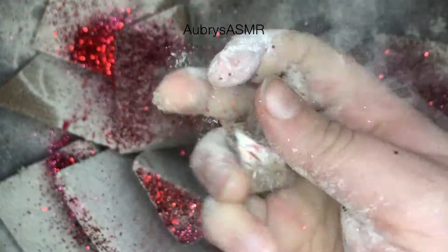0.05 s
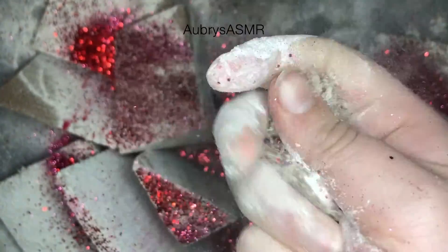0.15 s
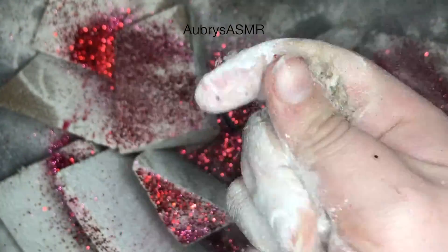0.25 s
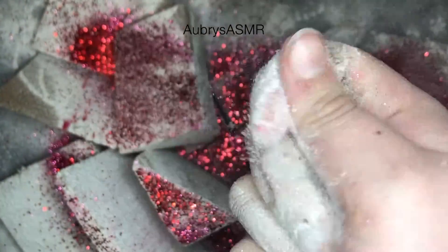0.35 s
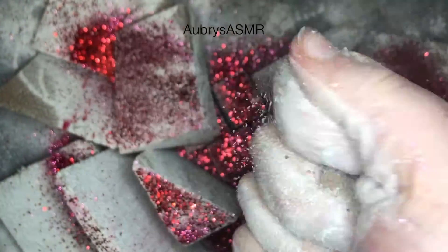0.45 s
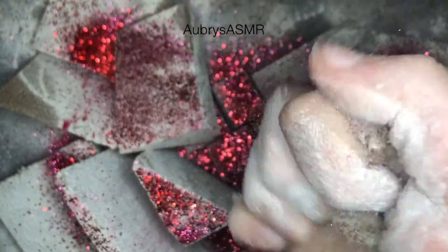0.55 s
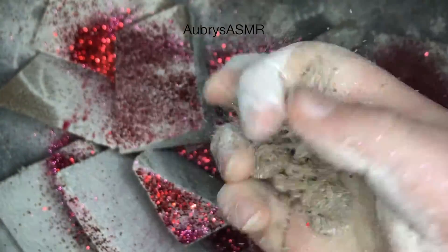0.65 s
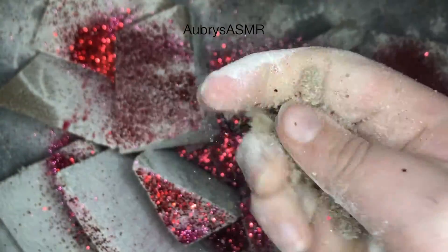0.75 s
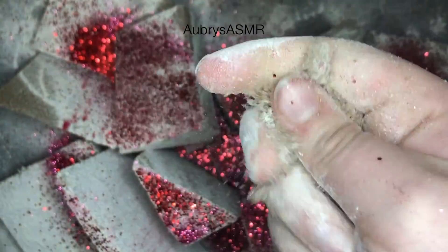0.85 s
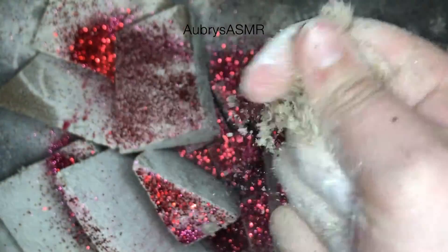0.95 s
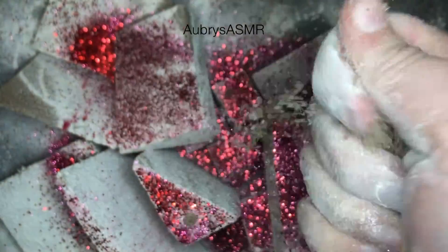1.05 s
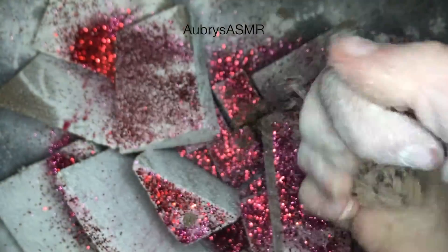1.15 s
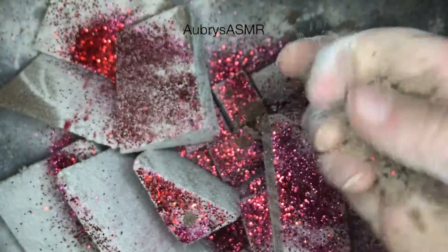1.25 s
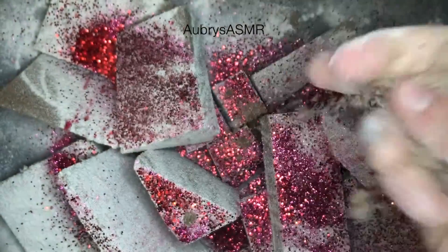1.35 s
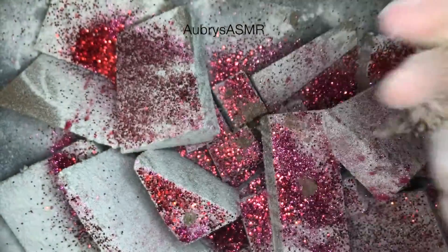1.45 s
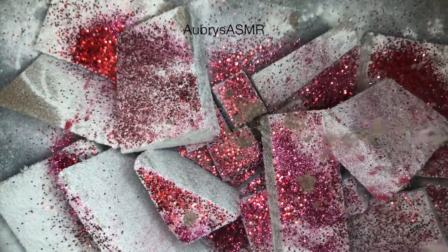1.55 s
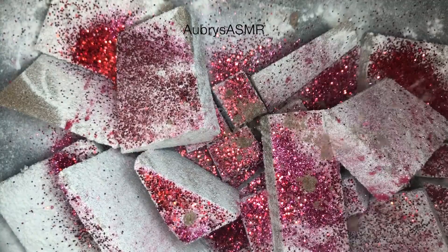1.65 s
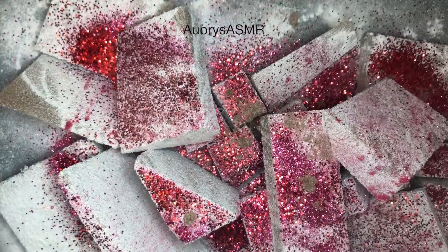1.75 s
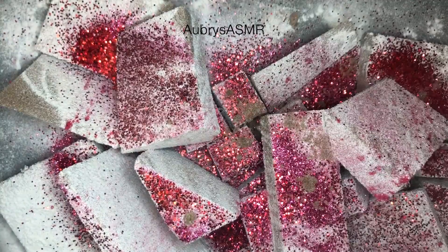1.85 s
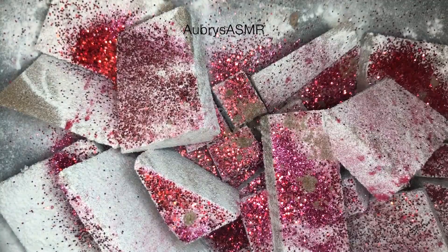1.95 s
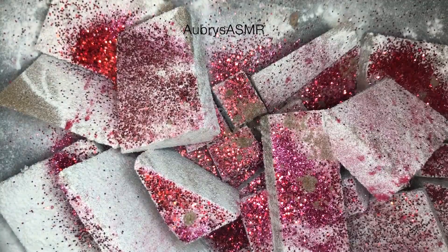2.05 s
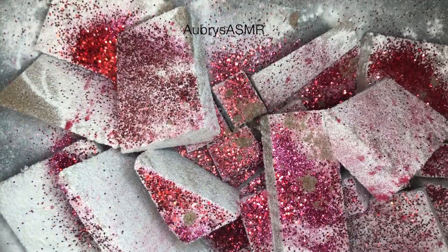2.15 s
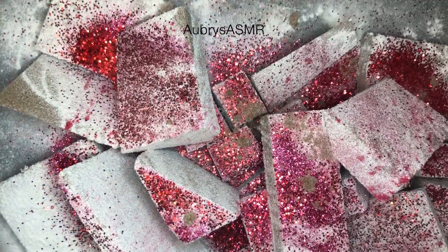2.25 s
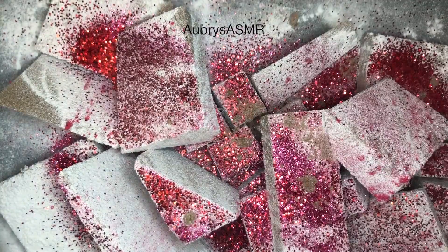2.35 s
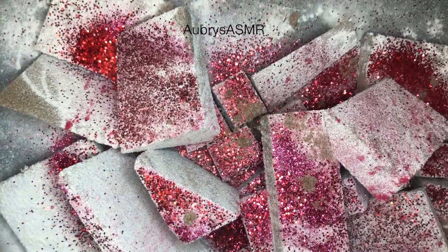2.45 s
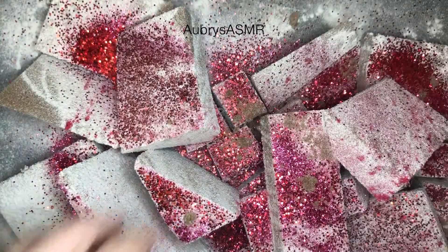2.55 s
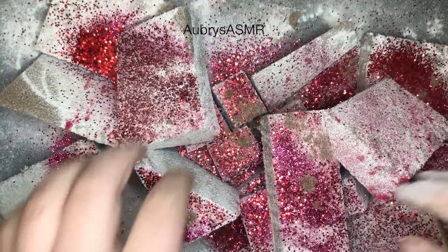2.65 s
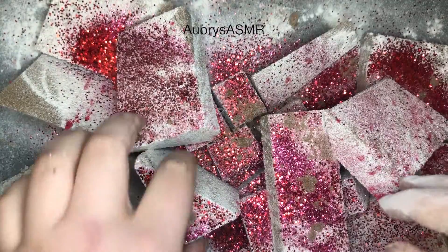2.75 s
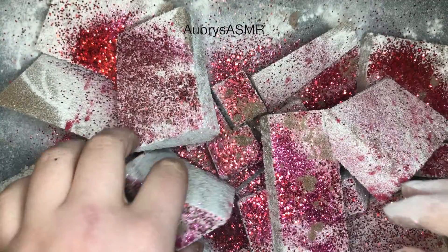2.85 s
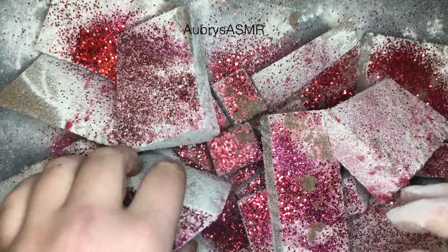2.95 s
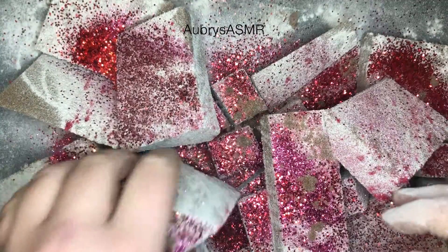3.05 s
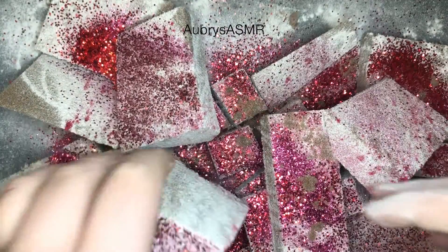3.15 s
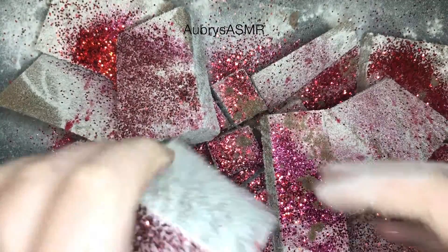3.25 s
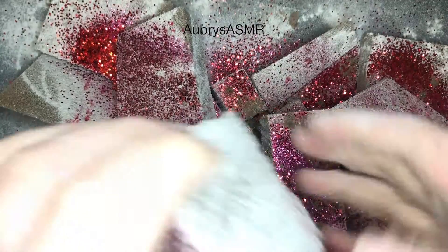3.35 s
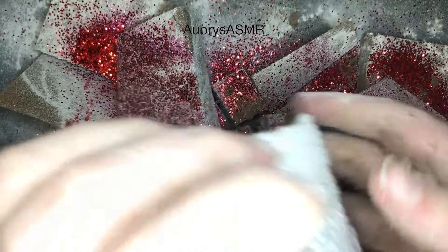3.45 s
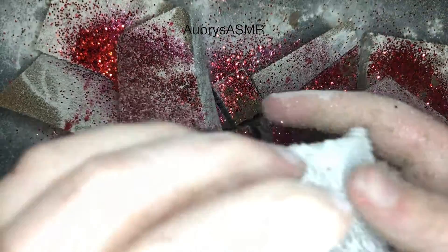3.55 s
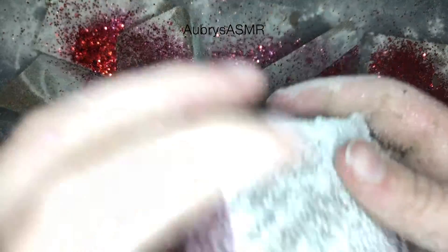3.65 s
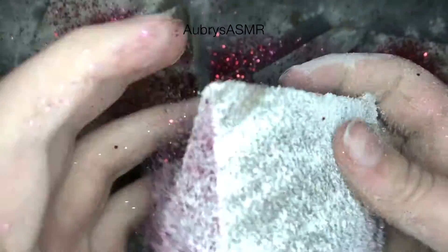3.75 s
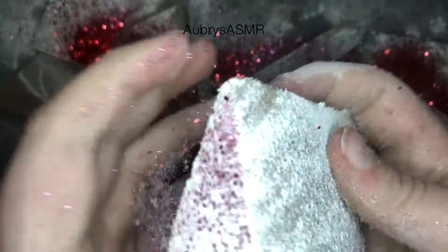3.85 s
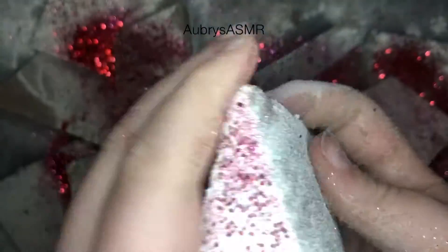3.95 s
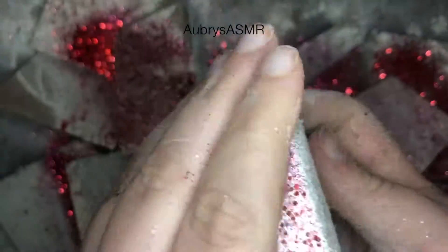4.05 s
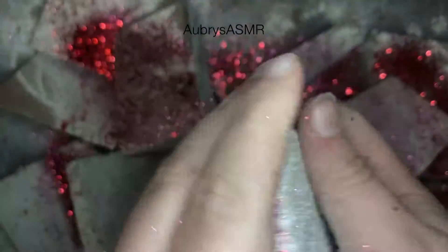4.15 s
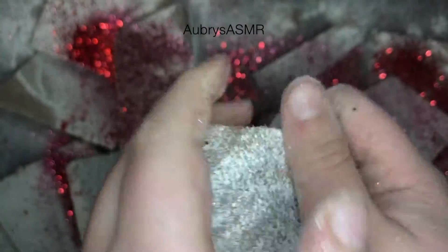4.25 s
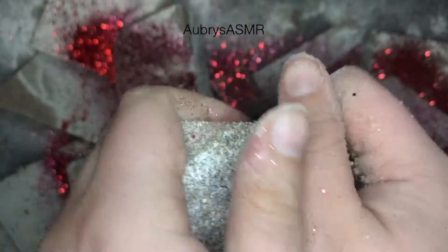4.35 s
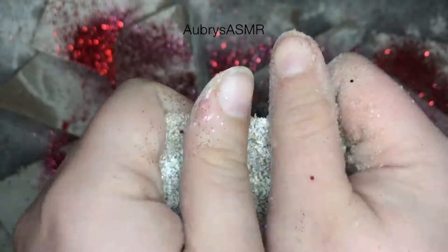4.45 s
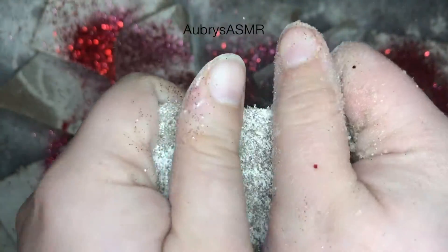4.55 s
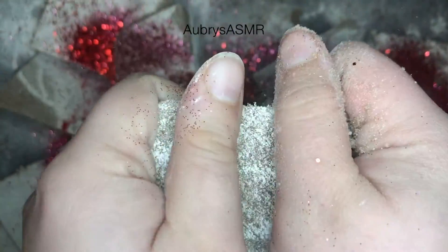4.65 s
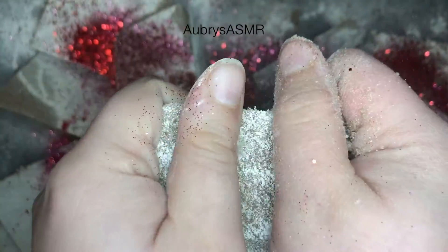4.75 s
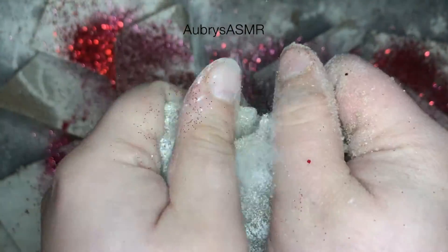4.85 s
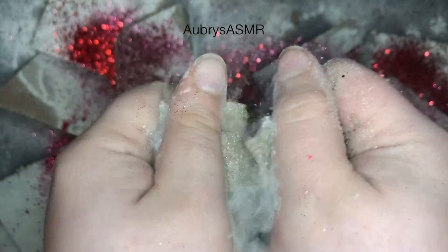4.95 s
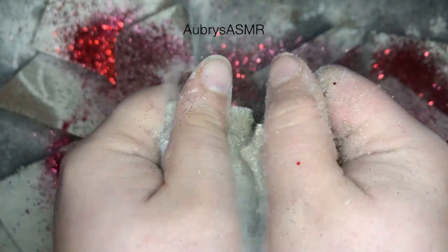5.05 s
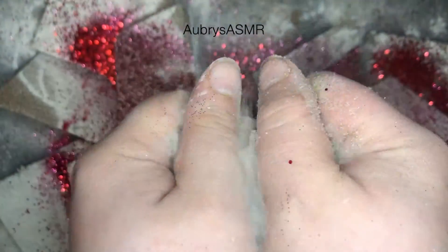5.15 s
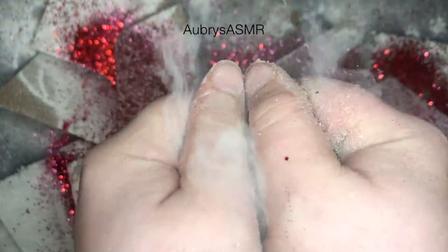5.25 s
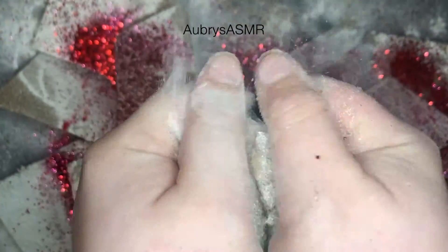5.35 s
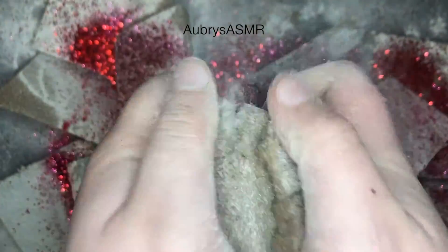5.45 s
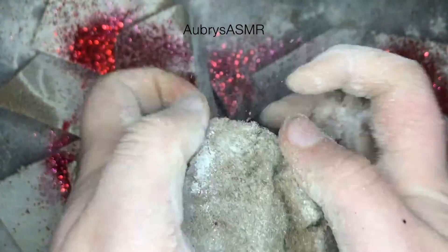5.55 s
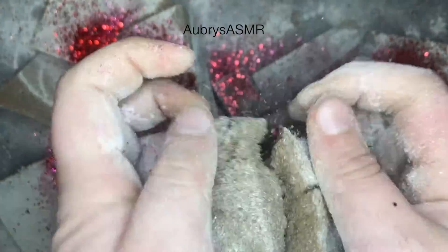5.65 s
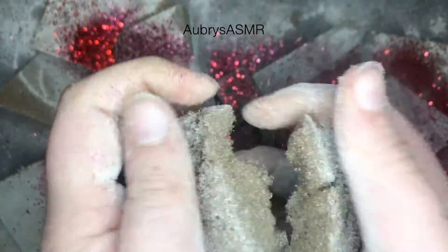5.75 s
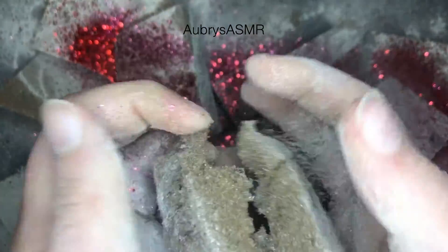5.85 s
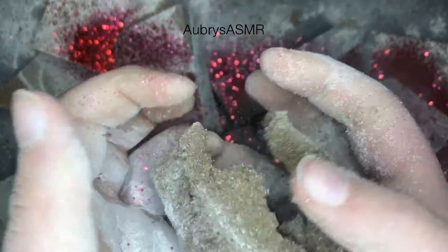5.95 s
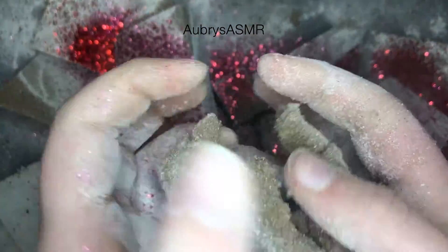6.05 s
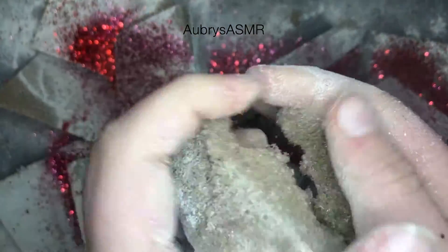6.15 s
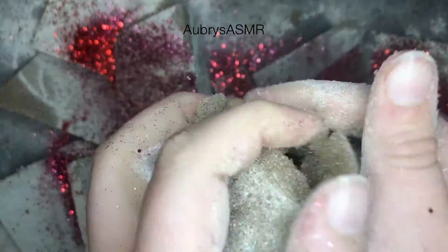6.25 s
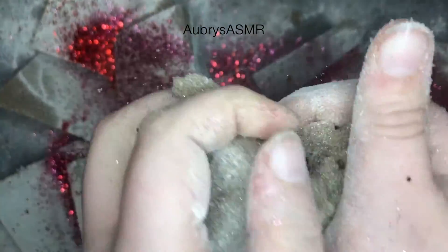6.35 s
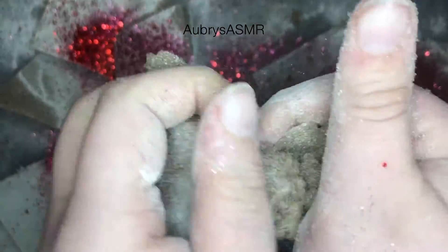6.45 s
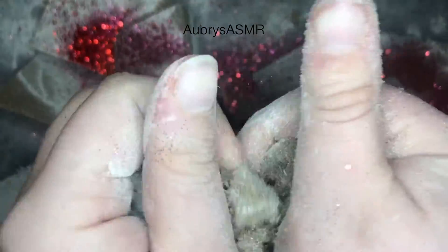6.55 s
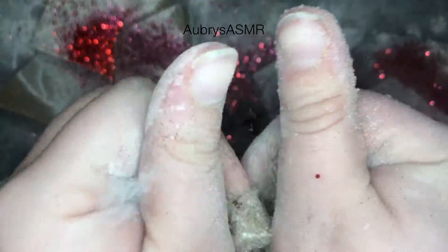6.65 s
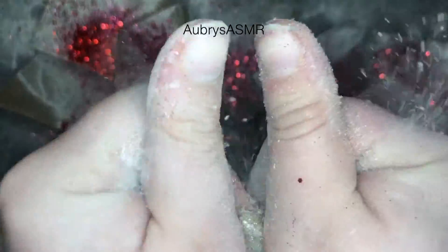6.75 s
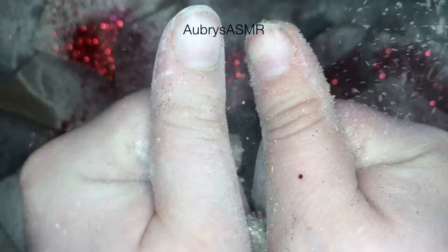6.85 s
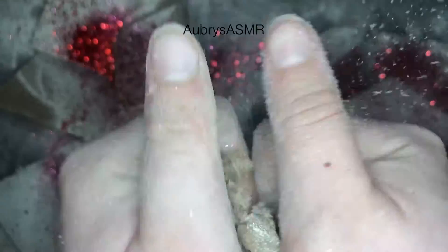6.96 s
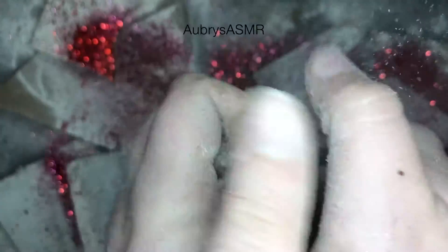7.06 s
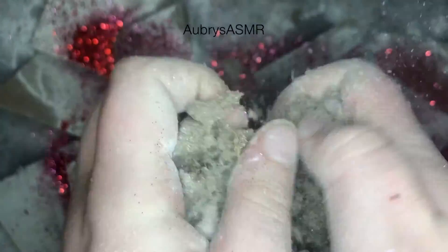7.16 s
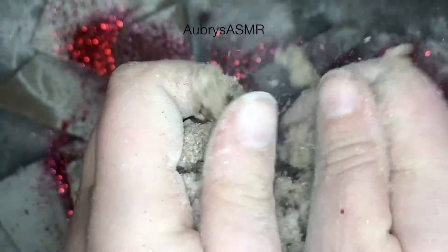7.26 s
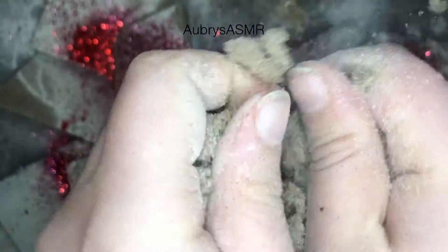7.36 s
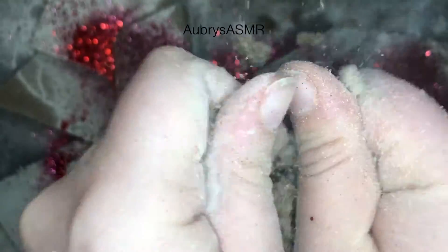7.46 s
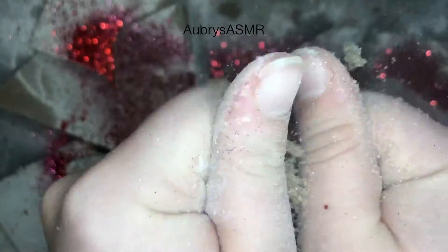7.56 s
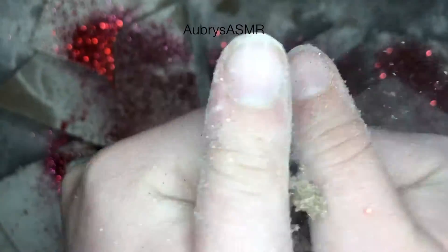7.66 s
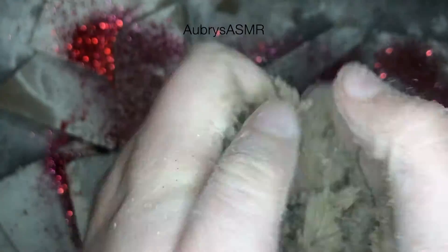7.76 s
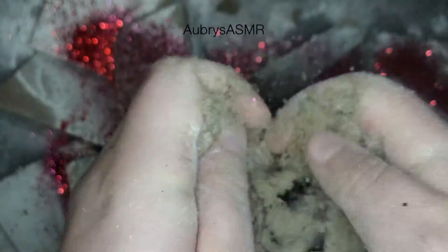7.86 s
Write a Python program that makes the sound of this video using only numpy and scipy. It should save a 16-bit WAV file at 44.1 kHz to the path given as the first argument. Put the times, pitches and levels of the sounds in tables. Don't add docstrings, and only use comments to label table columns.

```python
import sys
import numpy as np
from scipy import signal
from scipy.fft import rfft, irfft, next_fast_len
from scipy.io import wavfile

SR = 44100
rng = np.random.default_rng(int(sys.argv[2]) if len(sys.argv) > 2 else 0)


def boost_factor(decibels):
    exponent = np.asarray(decibels, float) / 20
    return 10 ** exponent


def master(y):
    cut = np.clip(np.atleast_2d(y).T, -1, 1)
    pcm = np.round(cut * 32767)
    wavfile.write(sys.argv[1], SR, pcm.astype(np.int16))


N = 347949


def rms_one(x):
    return x / np.sqrt(np.mean(x ** 2) + 1e-20)


def in_time(rows):
    s, *columns = np.transpose(rows)
    return [np.interp(np.arange(N) / SR, s, c) for c in columns]


def at_hz(points, hz):
    spectrum_hz, spectrum_db = np.transpose(points)
    return np.interp(np.log(hz), np.log(spectrum_hz), spectrum_db)


def drift(rate_hz):
    r = np.exp(-40 * np.pi * rate_hz / SR)
    slow = signal.lfilter([1], [1, -2 * r, r * r], rng.standard_normal(N // 20 + 2002))[2000:]
    return np.interp(np.arange(N) / 20, np.arange(len(slow)), rms_one(slow))


def resonance(x, hz, width_hz):
    r = np.exp(-np.pi * width_hz / SR)
    poles = [1, -2 * r * np.cos(2 * np.pi * hz / SR), r * r]
    return signal.lfilter([(1 - r * r) / 2, 0, (r * r - 1) / 2], poles, x + 1e-18)


def bursts(per_s, spread_db):
    sizes = boost_factor(spread_db * np.minimum(rng.exponential(1, N), 5)) * rng.choice([-1, 1], N)
    return rms_one(sizes * (rng.random(N) < per_s / SR))


def prompt(spectrum, colour_db, count):
    hz = np.maximum(np.arange(513), 1) * SR / 1024
    half_octaves = np.maximum(1 - np.abs(np.arange(15)[:, None] - 2 * np.log2(hz / 120)), 0)
    tint = rng.standard_normal((count, 15)) @ half_octaves
    response_db = np.maximum(at_hz(spectrum, hz), -50) + colour_db * tint
    cepstrum = irfft(np.log(boost_factor(response_db)), 1024)
    cepstrum[:, 1:512] *= 2
    return irfft(np.exp(rfft(cepstrum[:, :512], 1024)), 1024)[:, :512]


def foam(spectrum, level_db, breaks, at_s, peak_db, cracks, per_s, spread_db, crack_db, wander_db, sharp,
         colour_db, count, contrast=1):
    pitches_hz = np.geomspace(spectrum[1][0], min(spectrum[-2][0], .42 * SR), count)
    fine = bursts(per_s, spread_db)
    dealt = rng.integers(0, count, N)
    grains = 0
    for k, hz in enumerate(pitches_hz):
        gain = (-1) ** k * boost_factor(at_hz(spectrum, hz))
        width_hz = hz / sharp
        favoured = boost_factor(wander_db * drift(5.2))
        ringing = resonance(resonance(fine * (dealt == k), hz, width_hz), hz, 2 * width_hz)
        grains = grains + gain * favoured * ringing
    cracked = signal.fftconvolve(cracks, prompt(spectrum, 0, count=1)[0])[:N]
    out = boost_factor(level_db) * rms_one(rms_one(grains) + boost_factor(crack_db) * rms_one(cracked))
    responses = prompt(np.array(spectrum) * [1, contrast], colour_db, count=len(breaks))
    rung = signal.fftconvolve(breaks, responses, axes=1)
    lead_s = .0004
    for s, db, ring in zip(at_s - lead_s, peak_db, rung):
        part = out[max(round(s * SR), 0):][:len(ring)]
        part += boost_factor(db) * ring[:len(part)] / np.abs(ring).max()
    return out


def efforts():
    # t/s, effort as cell fizz level/dB, hollow (struts over fizz) level/dB
    knead_first = [(0, -49, -5), (.045, -55.5, -7.5), (.11, -39.5, -7), (.135, -31.5, -3.5),
                   (.19, -30.5, -9), (.35, -31, -14.5), (.37, -37.5, -13.5), (.67, -50, -3.5),
                   (.72, -60, -7.5)]
    knead_again = [(0.78, -53, -4), (0.86, -36.5, -7.5), (.9, -38, -4.5), (.92, -37.5, -12),
                   (1.07, -45, -15), (1.186, -47.5, 1), (1.216, -55, -0.5), (1.312, -56.5, -10),
                   (1.32, -62, -6)]
    knead_last = [(1.4, -43.5, -7.5), (1.47, -33.5, -15), (1.56, -51.5, -5.5), (1.6, -44, -10),
                  (1.69, -53.5, -13), (1.87, -61.5, 6.5), (1.98, -80.5, -11)]
    reach = [(2.04, -48.5, -13), (2.46, -81.5, 8.5), (2.81, -80.5, 4), (2.877, -56, -2.5),
             (3.07, -57.5, -0.5), (3.34, -72.5, 1), (3.52, -64.5, 6), (3.547, -69, -4)]
    turn_block = [(3.562, -42, 3), (3.581, -54.5, 7), (3.63, -51.5, -2), (3.67, -44.5, -4.5),
                  (3.73, -65, -4.5), (3.98, -46, -4.5)]
    press = [(4.05, -44.5, -3.5), (4.334, -35.5, -4.5), (4.438, -36.5, -4), (4.5, -29.5, -8),
             (4.536, -40, -4), (4.564, -32, -6), (4.612, -35.5, -5.5), (4.634, -34.5, -6.5),
             (4.72, -40.5, -4.5)]
    split_block = [(4.88, -32.5, -7), (4.94, -32, 0.5), (4.96, -50, -6), (4.99, -29.5, -5.5),
                   (5.07, -36.5, -8.5), (5.12, -28.5, -8.5), (5.25, -30.5, -12), (5.34, -37, -12.5),
                   (5.42, -50.5, -13)]
    shift_grip = [(5.46, -45.5, 1.5), (5.652, -54, -4), (5.656, -46.5, -3), (5.836, -59, 0.5),
                  (6.018, -63, -4), (6.07, -62, -2), (6.14, -52.5, 1.5)]
    fold = [(6.24, -44.5, -6), (6.262, -34.5, -8), (6.5, -35, -6.5), (6.594, -31, -7), (6.626, -32.5, -8),
            (6.714, -32, -4), (6.844, -33, -17), (7.016, -45, -6.5), (7.03, -48.5, -1.5)]
    crumble = [(7.08, -45, -1.5), (7.186, -42, -8), (7.244, -53, -5), (7.306, -41, -10),
               (7.366, -44.5, -5.5), (7.474, -32, -7), (7.578, -35, -15), (7.738, -52, -0.5),
               (7.89, -43.5, -6)]
    kneading = knead_first + knead_again + knead_last
    crushing = reach + turn_block + press + split_block
    return in_time(sorted(kneading + crushing + shift_grip + fold + crumble))


def tearing(per_s, fade_s, jump_db):
    # t/s, jump level/dB, fade/s
    slips = [(0.134, 5, 0.0059), (1.998, -5, 0.016), (2.041, 5, 0.025), (2.372, 14, 0.072),
             (2.54, 12, 0.014), (2.613, 8.5, 0.19), (2.859, 10.5, 0.026), (2.977, 20.5, 0.033),
             (3.073, 19, 0.0069), (3.18, 20.5, 0.026), (3.407, 25, 0.0043), (3.44, 16, 0.0084),
             (3.559, 9, 0.016), (3.787, 14, 0.015), (3.843, -9.5, 0.0054), (3.871, 17, 0.021),
             (3.919, 1, .015), (4.881, 16.5, 0.0099), (4.895, -6, 0.013), (2.942, -15.5, 0.046)]
    # middle t/s, half width/s, level/dB
    surges = [(0.122, 0.0053, -1), (0.301, 0.004, -3.5), (0.43, 0.009, 2.5), (0.578, 0.01, -6),
              (1.093, 0.028, -3.5), (3.205, 0.0054, -5), (3.555, 0.0043, -12), (3.708, 0.015, 10.5),
              (3.907, 0.006, -3), (4.038, 0.0061, 7.5), (4.08, 0.014, 0.5), (4.139, 0.0055, 3.5),
              (4.173, 0.041, 4.5), (4.431, 0.0041, -3), (4.755, 0.004, -1), (4.808, 0.023, 2.5),
              (4.895, 0.0046, -5), (4.944, 0.004, -6), (4.966, 0.0053, 8.5), (5.019, 0.004, -9.5),
              (5.04, 0.0065, 4), (5.172, 0.011, -7), (5.235, 0.0044, 6.5), (5.73, 0.024, -7),
              (6.255, 0.0083, -4), (6.654, 0.027, -6.5), (6.853, 0.004, 5), (6.963, 0.016, 1)]
    leaps = rng.exponential(1, N) * (rng.random(N) < per_s / SR)
    sag = signal.lfilter([1], [1, -np.exp(-1 / (fade_s * SR))], leaps + 1e-18)
    front_db = jump_db * np.tanh(sag / 2 - sag.mean() / 2)
    t, rise_s = np.arange(SR // 4) / SR, 0.0014
    for s, db, slip_fade_s in slips:
        decay = np.exp(-t / max(slip_fade_s, 1e-3))
        front_db[round(s * SR):][:len(t)] += db * decay * (1 - np.exp(-t / rise_s))
    for s, half_s, db in surges:
        near = np.arange(max(round((s - .08) * SR), 0), round((s + .08) * SR))
        front_db[near] += db * np.exp(-((near / SR - s) / max(half_s, 2e-3)) ** 2)
    return front_db


def coarse(crunch_db):
    # middle t/s, half width/s, thud level/dB, chip grind over thud level/dB
    shears = [(.31, 0.058, -68, 14), (.39, 0.092, -58, 1), (.885, 0.022, -80, 18), (7.12, .07, -78, 17.5),
              (1.01, 0.035, -66, 7), (1.47, 0.043, -71.5, 8.5), (1.67, 0.022, -69, 7.5),
              (2.95, 0.3, -72.5, -3), (3.561, 0.012, -61, -1), (3.67, 0.02, -61.5, 0), (4.2, 0.16, -61, 0),
              (4.341, 0.053, -48.5, 2), (4.48, 0.036, -56, 3), (4.87, 0.046, -68, -6),
              (5.04, 0.015, -72.5, 0), (5.22, 0.11, -64, 7), (5.537, 0.015, -54, 0),
              (5.67, 0.065, -63.5, -5), (6.28, 0.053, -58, 6), (6.42, 0.058, -51, -2),
              (6.53, 0.03, -55, -7.5), (6.59, 0.044, -59.5, 5), (6.72, 0.14, -63, 7.5),
              (6.88, 0.036, -58, 0.5), (7.19, 0.057, -62.5, 0.5), (7.62, 0.05, -55.5, 0),
              (7.84, 0.022, -60.5, 3.5)]
    middle_db, grind_rest_db, grind_follows, shear_rest_db, shear_follows = -49.5, -64.5, 0.67, -71.5, 0.3
    t, swing_db = np.arange(N) / SR, crunch_db - middle_db
    grind = boost_factor(grind_rest_db + grind_follows * swing_db) ** 2
    shear = boost_factor(shear_rest_db + shear_follows * swing_db) ** 2
    for s, half_s, db, over_db in shears:
        near = slice(max(int((s - .4) * SR), 0), int((s + .4) * SR))
        swell = boost_factor(db) ** 2 * np.exp(-((t[near] - s) / half_s) ** 2)
        grind[near] += boost_factor(over_db) ** 2 * swell
        shear[near] += swell
    dip_s, dip_half_s, dip_db = 5.405, 0.045, -13
    pause_db = dip_db * np.exp(-((t - dip_s) / dip_half_s) ** 2)
    return 10 * np.log10(grind) + pause_db, 10 * np.log10(shear) + pause_db


def snaps(fizz_db, crunch_db):
    # t/s, bright peak level/dB, ringing
    # peak level/dB
    clear_breaks = [(0.0047, -43, -57), (0.0676, -37, -61), (0.1141, -25, -27), (0.1387, -9, -14),
                    (0.17, -28.5, -18.5), (0.1725, -27, -20.5), (0.1769, -26, -43), (0.1944, -19, -24),
                    (0.198, -14.5, -24), (0.2141, -18.5, -50), (0.2212, -11, -39), (0.2305, -17, -47.5),
                    (0.2394, -14.5, -21), (0.2451, -14, -41), (0.2588, -13, -43), (0.2627, -8, -25),
                    (0.2707, -23, -33), (0.2832, -21, -42), (0.2951, -16, -26), (0.3262, -12, -36),
                    (0.3419, -21, -45.5), (0.3515, -12, -41), (0.3544, -21, -43), (0.3635, -33, -54),
                    (0.3746, -42, -28), (0.4013, -31, -33), (0.4227, -19, -24.5), (0.4419, -27, -29),
                    (0.4481, -21, -47), (0.48, -27, -42), (0.4847, -26, -42), (0.534, -26, -50),
                    (0.571, -15.5, -32), (0.7017, -39, -59), (0.9116, -42, -45), (0.9227, -29, -64),
                    (0.9299, -30, -48), (1.3544, -36, -44), (1.4047, -31, -39), (1.4106, -30, -49),
                    (1.4194, -23, -48), (1.4421, -26, -46), (1.455, -30, -50), (1.5026, -28, -45),
                    (1.5995, -36, -45.5),
                    (1.855, -46, -42), (2.04, -32, -40), (2.8613, -37, -50), (2.8683, -42, -49),
             (2.9318, -38, -58), (3.0362, -42, -45), (3.0757, -43, -53), (3.0813, -41, -36),
             (3.216, -50, -52), (3.2337, -55, -44), (3.4089, -60, -55), (3.4139, -51, -57),
             (3.431, -59, -67), (3.4413, -53, -51), (3.4466, -53, -53), (3.4526, -49, -42),
             (3.4848, -61, -50), (3.4891, -57, -45), (3.5022, -50, -39), (3.5202, -41, -49),
             (3.5378, -50, -72), (3.5653, -26, -27), (3.574, -23.5, -19.5), (3.6261, -37.5, -47),
             (3.6423, -35, -52), (3.6542, -38, -51), (3.66, -30, -34), (3.673, -27, -31),
             (3.7281, -33, -42), (3.7467, -42, -64), (3.7625, -52, -78), (3.7713, -52, -62),
             (3.7771, -40, -52), (3.787, -36, -52), (3.7908, -29, -37), (3.797, -36, -54),
             (3.8166, -35, -54), (3.8455, -35.5, -46), (3.875, -34, -38), (3.878, -38, -47),
             (3.9204, -25, -44), (3.929, -34, -37), (3.937, -27, -45), (3.9735, -33, -32),
             (3.9859, -36, -31),
                    (4.3376, -21, -26.5), (4.3397, -11.5, -20), (4.443, -26, -40), (4.492, -12.5, -35),
                  (4.503, -13, -30), (4.531, -24, -29), (4.6265, -20, -40), (4.6303, -20, -42),
                  (4.636, -18, -27), (4.652, -23.5, -45), (4.6615, -17, -49), (4.6869, -20, -47),
                  (4.7132, -23, -37), (4.7232, -29, -38), (4.7551, -19, -27), (4.7705, -22, -34),
                  (4.8209, -18, -39), (4.8682, -17, -36.5), (4.8818, -9.5, -27), (4.8854, -18, -14.5),
                  (4.889, -16, -35), (4.8922, -23, -22), (4.9041, -14, -29), (4.908, -13, -33),
                  (4.911, -20, -24), (4.921, -17, -37), (4.929, -21, -27.5), (4.9354, -15, -17),
                  (4.938, -14, -18), (4.9552, -13.5, -26), (4.9858, -22, -47), (4.9933, -11, -11),
                  (4.998, -24, -34), (5.0126, -13, -32), (5.0167, -24, -34), (5.0284, -23, -35),
                  (5.0515, -18, -20.5), (5.087, -23, -32), (5.152, -12.5, -41), (5.157, -13.5, -25.5),
                  (5.1679, -19, -22), (5.191, -18, -43), (5.214, -18, -33), (5.237, -17.5, -38),
                  (5.3022, -14.5, -44), (5.3213, -25.5, -61), (5.3296, -26, -37), (5.3538, -26, -59),
                  (5.3618, -29, -51), (5.3785, -22, -60), (5.383, -17, -31.5), (5.409, -30, -52),
                  (5.4311, -41, -39), (5.8151, -43, -54), (5.8747, -44, -47),
                    (5.928, -41, -53), (5.9309, -39, -60), (6.0825, -41, -42), (6.087, -62, -43),
                  (6.1186, -35, -61), (6.1243, -46, -33), (6.1472, -49, -32), (6.2411, -31, -34),
                  (6.2559, -29, -43), (6.2679, -13, -22), (6.2843, -25, -34), (6.3219, -18, -39),
                  (6.34, -12, -30), (6.373, -15, -36), (6.3813, -17, -30), (6.3858, -23, -21),
                  (6.3968, -28, -35), (6.433, -25, -50), (6.5026, -27, -27), (6.5064, -13.5, -22.5),
                  (6.518, -20, -32), (6.5212, -19, -36), (6.524, -25.5, -18), (6.5749, -15, -37),
                  (6.588, -20, -23), (6.6419, -22, -34), (6.656, -20.5, -22.5), (6.6743, -10.5, -23),
                  (6.6968, -22, -42), (6.8527, -17, -40.5), (6.8624, -24, -39), (6.8849, -25, -47),
                  (6.897, -24, -50), (6.9068, -22, -52), (6.941, -23, -51), (7.0195, -25, -45),
                  (7.1592, -30, -51), (7.168, -29, -45), (7.208, -27, -52), (7.2366, -39, -51),
                  (7.2508, -38, -55), (7.2623, -40, -48), (7.3236, -37, -56), (7.4163, -26, -47),
                  (7.4927, -19.5, -52), (7.5006, -22, -45), (7.5081, -22, -52), (7.5543, -17, -41),
                  (7.6244, -27, -46), (7.8267, -34, -32),
                    (4.1034, -39.5, -34), (4.133, -36, -28), (4.392, -24, -20), (4.463, -31, -31),
              (4.5707, -30, -22.5), (4.804, -31.5, -25.5), (4.8309, -28, -23), (5.104, -26, -24),
              (5.473, -42, -35), (6.798, -25, -29)]
    strays_per_s, full_effort_db, stray_over_db, stray_spread_db = 45, -27, 8.5, 4.5
    place, luck, size, tone = rng.random((4, 300))
    at = (place * (N - 1)).astype(int)
    effort = boost_factor(fizz_db[at] - full_effort_db) ** .5
    due = luck < strays_per_s * N / SR / len(at) * effort
    over_db = stray_over_db + stray_spread_db * (2 * size - 1)
    bright_db = fizz_db[at] + over_db
    ringing_db = crunch_db[at] + over_db - 2 * stray_spread_db * tone
    strays = np.transpose([at / SR, bright_db, ringing_db])
    return np.transpose(np.vstack([clear_breaks, strays[due]]))


def spatters(burst_s, tail_db, tail_s):
    t = np.arange(int(.012 * SR)) / SR
    burst = np.e * t / burst_s * np.exp(-t / burst_s)
    tail = boost_factor(tail_db) * np.exp(-t / tail_s)
    return (burst + tail) * rng.standard_normal((520, len(t)))


def knocks(cycles, blur_s, rough):
    # t/s, peak level/dB, f/Hz
    partings = [(0.232, -34, 1670), (0.282, -32, 1570), (0.312, -23, 1730), (0.314, -34, 784),
                (0.376, -35, 1000), (0.401, -38, 1150), (0.421, -46, 1010), (0.44, -37, 1010),
                (0.569, -34, 2020), (1.236, -50.5, 900), (3.0, -47, 2450), (3.562, -39, 1800),
                (3.571, -39, 1560), (4.343, -40, 1390), (4.37, -34.5, 600), (4.464, -35, 813),
                (4.492, -37, 700), (4.993, -22, 2120), (5.535, -51, 300), (5.664, -50.5, 200),
                (6.313, -38, 1550), (6.336, -31.5, 1630), (6.374, -34.5, 743), (6.441, -42, 450),
                (6.506, -26.5, 1910), (6.525, -19, 2120), (6.587, -32, 1710), (6.615, -30.5, 1580),
                (6.72, -30.5, 1650), (6.861, -38, 830), (6.89, -37.5, 818), (7.206, -51, 121)]
    out, t = np.zeros(N), np.arange(int(.04 * SR)) / SR
    pushes = rng.standard_normal((len(partings), len(t)))
    for (s, db, hz), push in zip(partings, pushes):
        blow = (t == 0) + rough * push * np.exp(-t / blur_s)
        ring = resonance(resonance(blow, hz, hz / cycles), hz, hz)
        at = round(s * SR)
        out[at:at + len(t)] += boost_factor(db) * ring / np.abs(ring).max()
    return out


def brushing(front_db):
    # t/s, level/dB
    strokes = [(1.5, -80), (1.6, -52.5), (1.85, -62), (1.98, -74), (2.005, -57), (2.05, -54), (2.2, -55),
               (2.25, -58), (2.33, -84)]
    # t/s, peak level/dB
    flicks = [
        (1.855, -18),
        (2.0403, -17.5),
        (2.195, -32),
    ]
    grains = boost_factor(in_time(strokes)[0] + front_db) * bursts(12000, 3.1) * 2
    for s, db in flicks:
        grains[round(s * SR)] += boost_factor(db) * 2
    grains = signal.sosfilt(signal.cheby1(8, 2, 2700, "high", fs=SR, output="sos"), grains + 1e-18)
    return signal.sosfilt(signal.butter(2, 6000, fs=SR, output="sos"), grains)


def hollows():
    # middle t/s, half width/s, level/dB
    rests = [
        (3.3, 0.17, -76),
        (5.95, 0.38, -73),
    ]
    t, hz, width_hz = np.arange(N) / SR, 1590, 220
    air = resonance(resonance(rng.standard_normal(N), hz, width_hz), hz, width_hz)
    opening = sum(boost_factor(db) * np.exp(-((t - s) / half_s) ** 2) for s, half_s, db in rests)
    return opening * rms_one(air)


def room_tone():
    # f/Hz, level/dB per Hz
    room_spectrum = [(18, -47), (30, -5), (124, -3.5), (311, -9), (473, -21), (649, -20), (1130, -17.5),
                     (1250, -20), (2060, -19), (3310, -24), (7670, -40), (10500, -36), (16000, -44)]
    # t/s, level/dB
    room_level = [(0, -70), (4.9, -66.5), (5.1, -73.5), (5.33, -72), (5.41, -76), (5.48, -69), (5.6, -70),
                  (6.2, -71), (7.89, -68)]
    out, edges_hz = 0, 35 * 2 ** np.arange(0, 9.1, .5)
    white = rng.standard_normal((2, N))
    for k, (low, high) in enumerate(zip(edges_hz, edges_hz[1:])):
        band = signal.sosfilt(signal.butter(2, [low, high], "band", fs=SR, output="sos"), white[k % 2])
        out = out + boost_factor(at_hz(room_spectrum, np.sqrt(low * high))) * band
    hum = resonance(resonance(white[1], 126.0, 22), 122.5, 17)
    whine = resonance(resonance(white[0], 1600, 30), 1600, 40)
    tone = rms_one(out) + boost_factor(-10.0) * rms_one(hum) + boost_factor(-27) * rms_one(whine)
    return boost_factor(in_time(room_level)[0] + 2.0) * tone


def scene():
    # f/Hz, level/dB per Hz
    cell_spectrum = [(2650, -46.5), (4500, -16), (5170, -17.5), (8690, 1.5), (9920, -1.5), (15100, 0.5),
                     (16000, -2.5)]
    strut_spectrum = [(1120, -50.5), (1900, -8.5), (2370, -5.5), (2930, -3), (3230, 1), (5090, -9),
                      (6000, -8.5), (7800, -14), (13200, -120)]
    chip_spectrum = [(600, -14.5), (850, -11.5), (1300, -8), (1750, -3), (2100, -17)]
    lump_spectrum = [(120, -21), (170, -5), (400, 0), (780, 0.5), (1000, -14)]
    fizz_db, hollow_db = efforts()
    crunch_db = fizz_db + hollow_db
    grind_db, shear_db = coarse(crunch_db)
    front_db = tearing(70, 0.013, 3.4) + 0.18 * drift(200)
    cracks = bursts(400, 0.87)
    at_s, bright_db, ringing_db = snaps(fizz_db, crunch_db)
    breaks = spatters(0.00017, -14.5, 0.0025)
    cells = foam(cell_spectrum, fizz_db + front_db, breaks, at_s, bright_db + 2.0, cracks,
                 per_s=13000, spread_db=-0.5, crack_db=-10.0, wander_db=2.5, sharp=4.9, colour_db=1.5, count=12)
    struts = foam(strut_spectrum, crunch_db + front_db, breaks, at_s, ringing_db, cracks,
                  per_s=4000, spread_db=0.0, crack_db=-5.5, wander_db=2.5, sharp=9.5, colour_db=-2.5, count=14,
                  contrast=1.47)
    chip_db = grind_db + 1.08 * front_db + 0.74 * drift(35)
    chips = foam(chip_spectrum, chip_db, breaks, at_s, ringing_db - 21.5, cracks,
                 per_s=1500, spread_db=1.0, crack_db=-12.5, wander_db=1.0, sharp=7.0, colour_db=-5.0, count=7)
    lump_db = shear_db + 0.54 * front_db + 1.9 * drift(28)
    lumps = foam(lump_spectrum, lump_db, breaks, at_s, ringing_db - 38, cracks,
                 per_s=1200, spread_db=2.0, crack_db=-12.5, wander_db=4.5, sharp=3.3, colour_db=4.0, count=8)
    crush = cells + struts + chips + lumps
    hands = knocks(1.53, 0.0011, 0.18) + brushing(1.8 * front_db)
    return (crush + hands + room_tone() + hollows())[None]


def top_cut(x):
    return signal.sosfilt(signal.butter(12, 17000, fs=SR, output="sos"), x)


def record(dry):
    # f/Hz, width/Hz, level/dB
    mic_port = [(1922, 164, -7), (3300, 54, -0.5), (9200, 1200, -0.5), (12100, 900, -1)]
    for hz, width_hz, db in mic_port:
        dry = dry + (boost_factor(db) - 1) * resonance(dry, hz, width_hz)
    size, cutoff_hz = next_fast_len(N), 15700
    bins_hz = np.arange(size // 2 + 1) * SR / size
    passed = np.clip((cutoff_hz - bins_hz) / 120 + 1, 0, 1) ** 2
    mix = irfft(rfft(dry, size) * passed, size)[:, :N]
    return top_cut(mix)


dry = scene()
out = record(dry)
master(out)
```